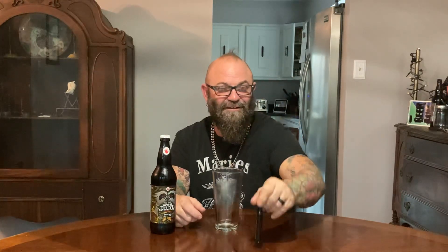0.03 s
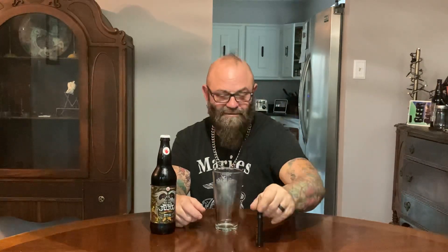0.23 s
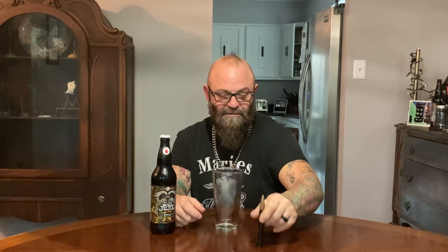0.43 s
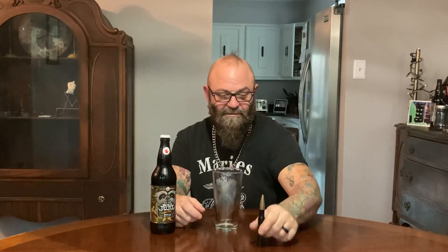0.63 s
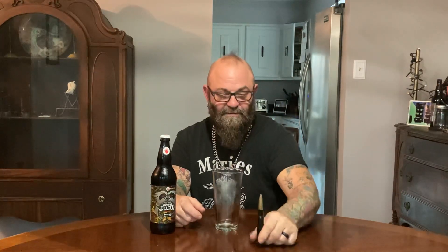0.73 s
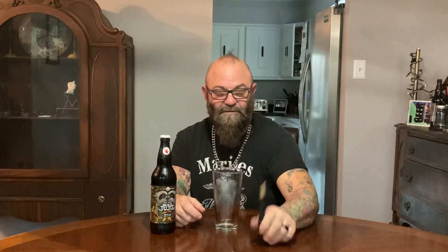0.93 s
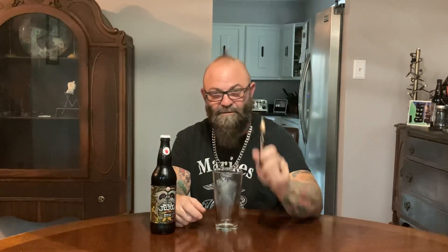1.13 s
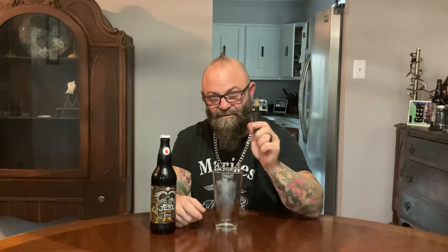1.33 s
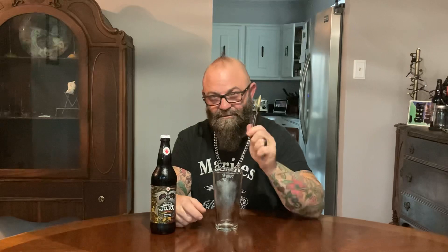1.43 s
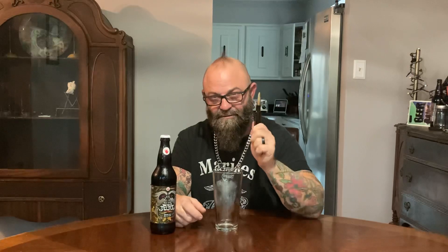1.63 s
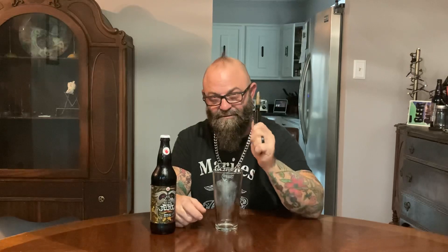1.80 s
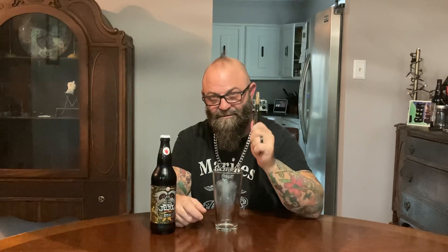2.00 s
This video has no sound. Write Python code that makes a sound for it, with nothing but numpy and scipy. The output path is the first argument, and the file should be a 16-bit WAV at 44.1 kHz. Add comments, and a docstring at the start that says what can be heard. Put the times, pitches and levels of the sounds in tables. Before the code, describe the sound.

A small metal object hits a wooden table with one sharp, loud knock at about 0.1 seconds, ringing in the room for half a second. Around 0.7 seconds come a few softer bumps and light clinks as it shifts, then another cluster near 1.05 seconds as it is lifted. A faint low hum from the wood lingers over quiet room noise until about 2 seconds.

```python
"""A sharp knock rings out in a live room: a metal bottle opener set end-down on a wooden dining table,
then softer bumps and clinks as it is shifted and lifted off. Each impact sends a dispersive bending wave
through the top and excites the normal modes of wood and metal, leaving the table humming low.
A limiter ducks on the knock and lets the reverberation swell back over a quiet background."""
import sys
import numpy as np
from scipy import signal
from scipy.fft import rfft, irfft
from scipy.io import wavfile
from scipy.ndimage import uniform_filter1d, minimum_filter1d, map_coordinates

SR = 44100
rng = np.random.default_rng(int(sys.argv[2]) if len(sys.argv) > 2 else 0)


def to_wav(sig):
    """Store sig (one row per channel, or 1-D mono) as 16-bit WAV at the path in sys.argv[1].

    Samples outside -1..1 are clipped; the rate is SR.
    """
    pcm = np.clip(np.atleast_2d(sig), -1, 1) * 32767
    pcm = np.round(pcm).astype(np.int16)
    wavfile.write(sys.argv[1], SR, pcm.T)  # frames by channels


N = 90890
TIME_S, FREQ_HZ = np.arange(N) / SR, np.fft.rfftfreq(N, 1 / SR)


# impacts of the opener on the table: start_s, level_db, corner_hz, metal_relative_db
IMPACTS = [(0.0907, 10, 12400, 11), (0.705, -48, 4000, 27), (0.728, -37.5, 4430, 28),
           (0.737, -15.5, 650, -29), (0.749, -29, 1180, -13), (0.761, -19, 596, -10),
           (0.917, -52, 3950, 26), (1.032, -43, 1730, -4), (1.036, -11, 305, -28), (1.054, -20, 456, -17),
           (1.068, -35.5, 740, 2), (1.093, -17.5, 356, -22)]

def contacts():
    """Impact excitation: a softer contact pushes the wood for longer; sharp ticks reach the metal."""
    push, tick = np.zeros(N), np.zeros(N)
    for start_s, level_db, corner_hz, metal_relative_db in IMPACTS:
        start = int(start_s * SR)
        pulse = TIME_S ** 3 * np.exp(-2 * np.pi * corner_hz * TIME_S)
        push[start:] += undb(level_db) * (pulse / pulse.sum())[:N - start]
        tick[start] += undb(level_db + metal_relative_db)
    return push, tick


# spectrum of the top's bending wave: frequency_hz, gain_db
WAVE_SPECTRUM = [(40, -21.5), (90, -12.5), (150, 10.5), (240, 15), (350, 15), (500, 18), (730, 23),
                 (950, 21.5), (1280, 26), (1480, 23), (1900, 11), (2250, 10.5), (2620, 9), (3100, 9.5),
                 (3800, -6.5), (4900, -12), (6000, -24), (7300, -16.5), (9000, -34.5), (11000, -18.5),
                 (15000, -26)]
# paths straight across the top, then back from its rim: travel_at_1khz_s, gain_db
TRAVEL_PATHS = [(.0017, 4), (.0031, -8.5), (.0070, -16.5)]

def bending_wave():
    """Dispersion: the top carries treble faster than bass, so each path gives a short falling chirp."""
    cepstrum = irfft(np.log(spectral_gain(WAVE_SPECTRUM)), N)
    cepstrum[1:N // 2] *= 2  # folding the cepstrum gives a minimum-phase pulse
    cepstrum[N // 2 + 1:] = 0
    paths = sum(undb(gain_db) * np.exp(-4j * np.pi * travel_s * np.sqrt(1000 * FREQ_HZ))
                for travel_s, gain_db in TRAVEL_PATHS)
    return irfft(np.exp(rfft(cepstrum)) * paths, N)[:N // 2]


# normal modes of the table: pitch_hz, level_db, t60_s
TABLE_MODES = [(120.4, -54, 4.7), (134.9, -44.5, 2.5), (155, -40, 0.7), (182.6, -53, 2.2),
               (228, -26.5, 0.27), (231.7, -52, 4.5), (239, -59.5, 4.2), (292, -55, 0.9),
               (309.3, -47.5, 1.3), (376, -46.5, 1.2), (539, -44.5, 0.29), (723.5, -24.5, 0.27),
               (835.7, -31.5, 0.37), (961, -33, 0.62), (1042, -31.5, .3), (1141, -33, .3),
               (1197, -30.5, 0.53), (1298, -22, 0.18), (1450, -28.5, .35), (1715, -21.5, 0.2205),
               (1879.4, -32.5, .35), (2153, -31, 0.29), (3109, -35.5, .15)]

def table_ring():
    """Resonance: modes build as the wave crosses the top, the lowest slowly, and radiate no deep bass."""
    modes = 0
    for pitch_hz, level_db, t60_s in TABLE_MODES:
        build_s = 0.0013 * (1000 / pitch_hz) ** 2.1
        modes += (1 - np.exp(-TIME_S / build_s)) * damped_mode(pitch_hz, level_db, t60_s)
    bass_cut = signal.butter(4, 85, "high", fs=SR, output="sos")
    return signal.sosfilt(bass_cut, modes)


# normal modes of the opener: pitch_hz, level_db, t60_s
OPENER_MODES = [(3950, -56.5, .22), (4778, -65.5, .1), (6600, -72, 0.12), (6900, -67.5, .2),
                (7600, -71.5, 0.055), (12700, -70.5, .08)]

def opener_ring():
    """Damped free vibration: the metal rings in the hand, with a short noisy scrape of its edge."""
    band = signal.butter(2, (2219, 4800), "band", fs=SR, output="sos")
    scrape = undb(-39.5) * decay(t60_s=.05) * signal.sosfilt(band, rng.standard_normal(N))
    return sum(damped_mode(*mode) for mode in OPENER_MODES) + scrape


# reverberation bands of the room: centre_hz, gain_db, t60_s
ROOM_BANDS = [(60, 2, 0.37), (150, 2.5, 0.38), (268, 4, 0.65), (420, 2, .56), (749, -7, 0.63),
              (1220, -5, 0.61), (2100, 4, 0.69), (3100, -2, .52), (4800, 7.5, 0.61), (7700, 12, 0.61),
              (11200, 13.5, 0.31), (15000, 8.5, .26)]

def reverberation():
    """Reflection and absorption: dense early echoes, then a tail that dies soonest in the high treble."""
    noise = diffuse_field(coherent_below_hz=450)
    delay_s, build_s = 0.0023, .004
    onset = np.clip((TIME_S - delay_s) / build_s, 0, 1)
    early = undb(-7) * decay(t60_s=0.16)
    log_centres = np.log([row[0] for row in ROOM_BANDS])
    response = 0
    for (_, gain_db, t60_s), selector in zip(ROOM_BANDS, np.eye(len(ROOM_BANDS))):
        band = np.interp(np.log(FREQ_HZ + 1), log_centres, selector)
        envelope = onset * (decay(t60_s) + early)
        response += undb(gain_db) * irfft(noise * band, N) * envelope / np.linalg.norm(envelope)
    return response


# spectral density of the room noise: frequency_hz, relative_db
NOISE_SPECTRUM = [(20, -28.5), (42, -14.5), (58, 0), (85, -18.5), (125, -6), (190, -6.5), (300, -9.5),
                  (550, -13.5), (800, -24.5), (1300, -26.5), (2000, -40.5), (3000, -44.5), (7000, -51),
                  (15000, -49)]
# course of the low rumble: time_s, level_db
RUMBLE_LEVELS = [(0, -60.5), (.25, -64.5), (.38, -55), (.8, -69), (1.27, -53.5), (1.6, -74.5), (2.06, -69)]

def background(rumble_hz=60, width_hz=14, coherent_below_hz=524):
    """Ambient noise: a steady dull hush and a narrow-band rumble that comes and goes."""
    hush = irfft(diffuse_field(coherent_below_hz) * spectral_gain(NOISE_SPECTRUM), N)
    rumble_band = np.exp(-((FREQ_HZ - rumble_hz) / width_hz) ** 2)
    rumble = irfft(diffuse_field(coherent_below_hz) * rumble_band, N)
    rumble_db = np.interp(TIME_S, *np.transpose(RUMBLE_LEVELS))
    return undb(-58) * hush / hush.std() + undb(rumble_db) * rumble / rumble.std()


def diffuse_field(coherent_below_hz):
    """Spatial coherence: white-noise spectra at two points, alike in the bass and unrelated above."""
    mid, side = rfft(rng.standard_normal((2, N)))
    coherence = 1 / (1 + (FREQ_HZ / coherent_below_hz) ** 2)
    return (mid * np.sqrt(1 + coherence) + np.array([side, -side]) * np.sqrt(1 - coherence)) / np.sqrt(2)


def undb(db):
    """Decibels to amplitude ratio."""
    return 10 ** (np.asarray(db) / 20)


def spectral_gain(points):
    """Amplitude spectrum from levels interpolated on a log-frequency axis."""
    frequency_hz, level_db = np.transpose(points)
    return undb(np.interp(np.log(FREQ_HZ + 1e-3), np.log(frequency_hz), level_db))


def decay(t60_s):
    """Exponential decay, 60 dB in t60_s."""
    return np.exp(-np.log(1000) * TIME_S / t60_s)


def damped_mode(pitch_hz, level_db, t60_s):
    """Impulse response of a damped oscillator."""
    return undb(level_db) * np.sin(2 * np.pi * pitch_hz * TIME_S) * decay(t60_s)


def convolve(drive, response):
    """Linear response of each channel, cut to the scene's length."""
    return signal.fftconvolve(np.atleast_2d(drive), np.atleast_2d(response), axes=1)[:, :N]


def late_left(sound, lag_s):
    """Arrival-time difference: one sound reaches the left channel later."""
    return np.array([map_coordinates(sound[0], [np.arange(N) - lag_s * SR]), sound[0]])


def limit(sound, ceiling_db, hold_s, release_db_per_s, lookahead_s=0.0014):
    """Peak limiting: the gain ducks to meet the ceiling, holds, then recovers at a steady rate."""
    hold, ahead = int(hold_s * SR / 2), int(lookahead_s * SR) + 1
    peak_db = 20 * np.log10(np.abs(sound).max(axis=0) + 1e-9)
    excess_db = np.maximum(peak_db - ceiling_db, 0)
    held_db = -minimum_filter1d(-excess_db, 2 * hold + 1, origin=hold, mode="constant")
    recovery_db = release_db_per_s * TIME_S
    duck_db = np.maximum.accumulate(held_db + recovery_db) - recovery_db
    gain_db = uniform_filter1d(minimum_filter1d(-duck_db, 2 * ahead), 2 * ahead)
    return sound * undb(gain_db)


def scene():
    """Superposition: knock, metal and their reverberation, louder on the left, over wood and noise."""
    push, tick = contacts()
    knock = convolve(push, bending_wave())
    wood = convolve(push, table_ring())
    metal = convolve(tick, opener_ring())
    direct = late_left(knock + metal, lag_s=.00007)
    tail = convolve(knock + undb(-12) * metal, reverberation())
    pan = undb([[0.47], [-0.47]])
    return pan * (direct + tail) + late_left(wood, lag_s=.0001) + background()


def record(dry):
    """Dynamic range compression: a slow limiter, a fast one, then a steep cut of the highest treble."""
    ducked = limit(dry, ceiling_db=5, hold_s=0.16, release_db_per_s=76.5)
    limited = limit(ducked, ceiling_db=0, hold_s=.001, release_db_per_s=1801)
    treble_cut = signal.ellip(8, .2, 70, 15700, fs=SR, output="sos")
    return signal.sosfilt(treble_cut, limited)


dry = scene()
out = record(dry)
to_wav(out)
```